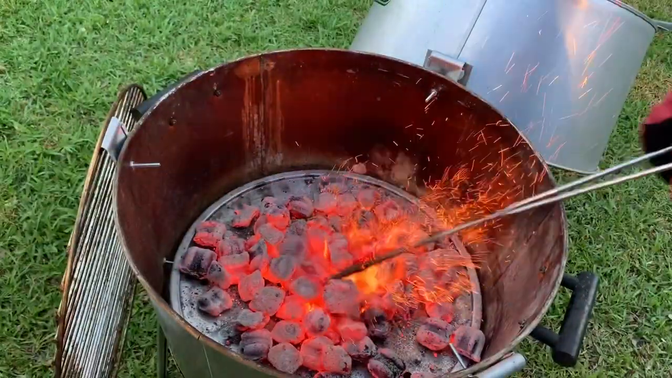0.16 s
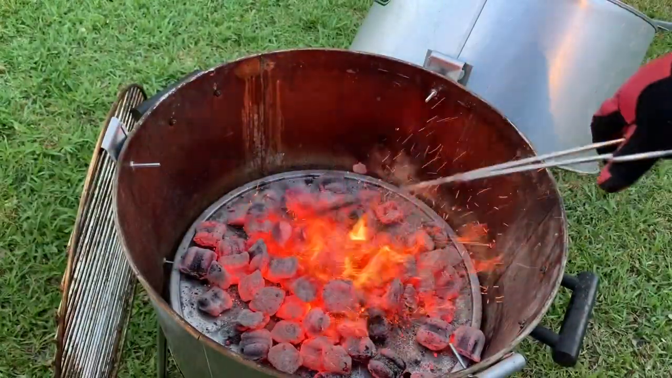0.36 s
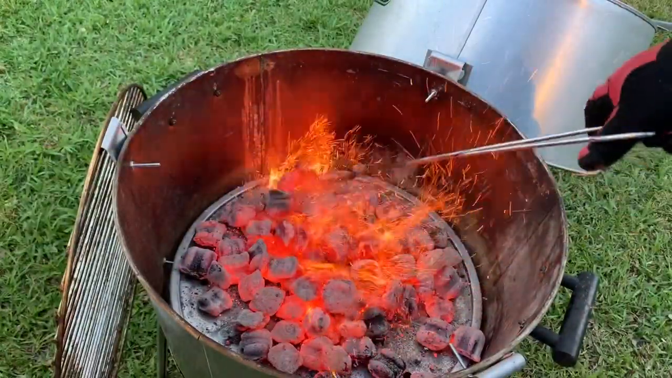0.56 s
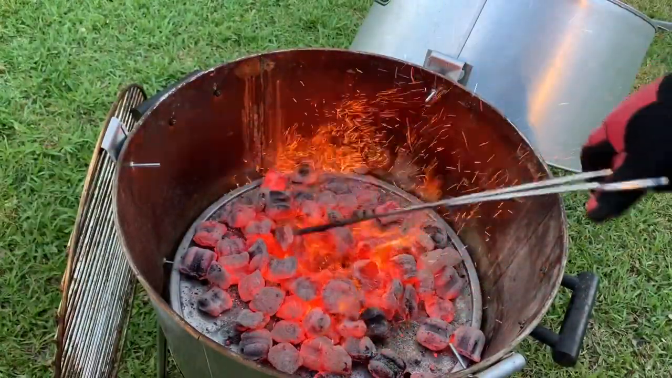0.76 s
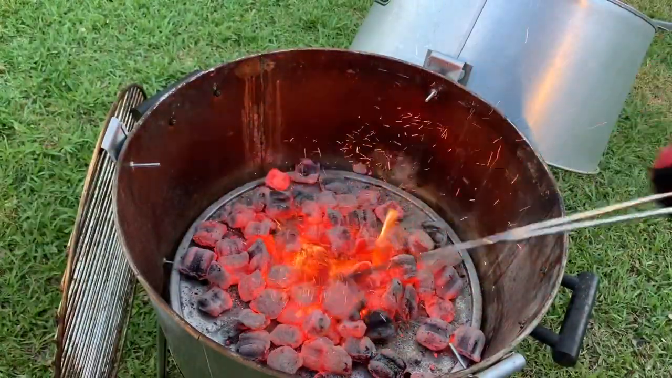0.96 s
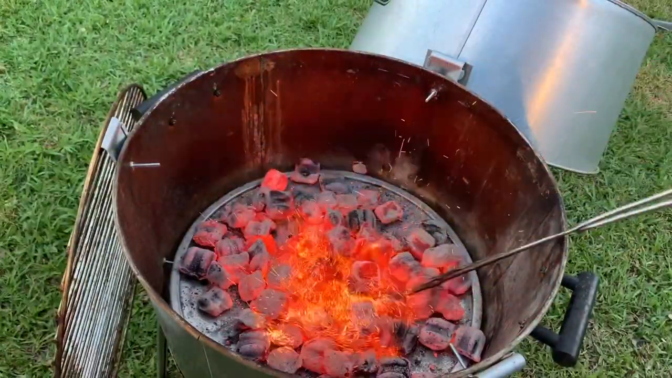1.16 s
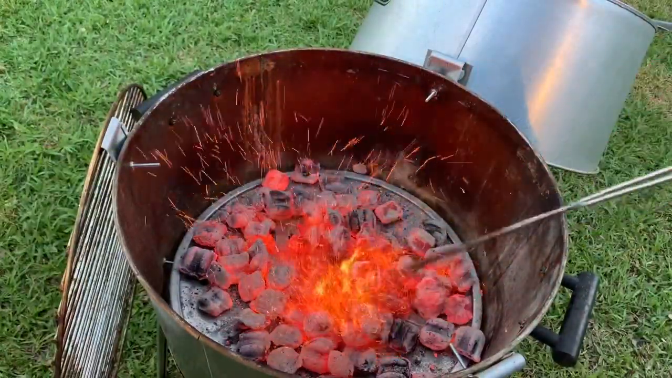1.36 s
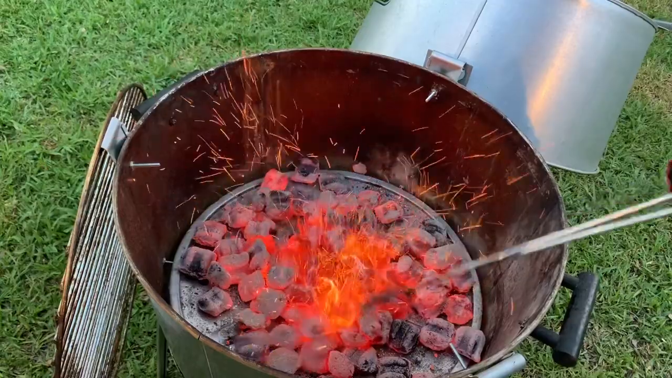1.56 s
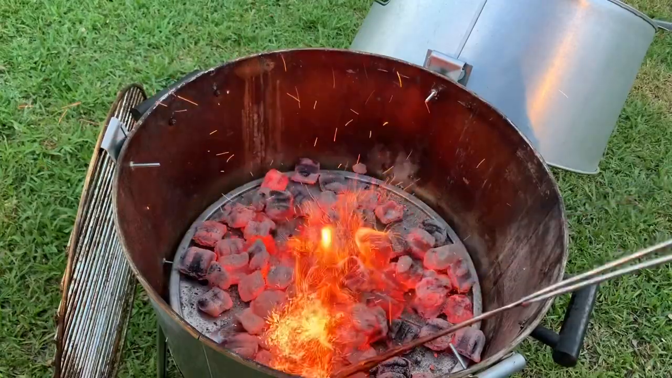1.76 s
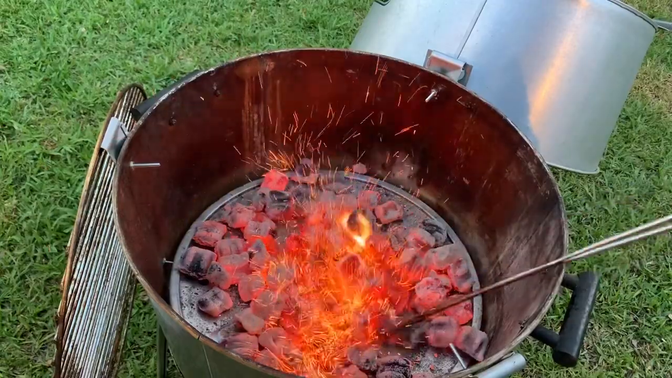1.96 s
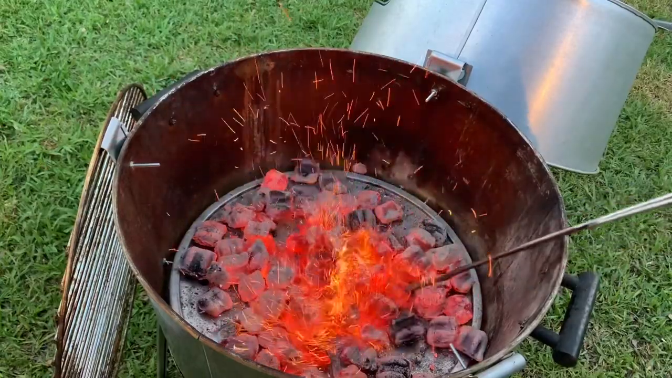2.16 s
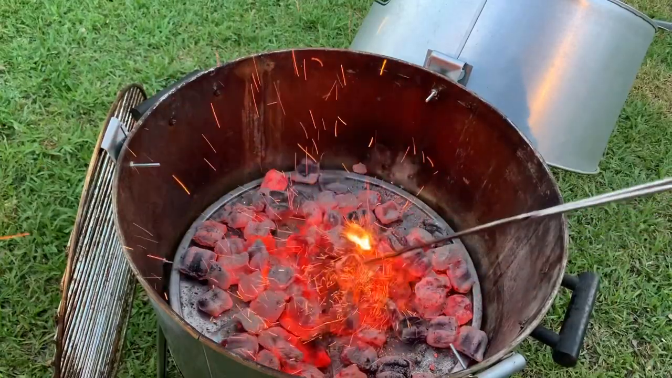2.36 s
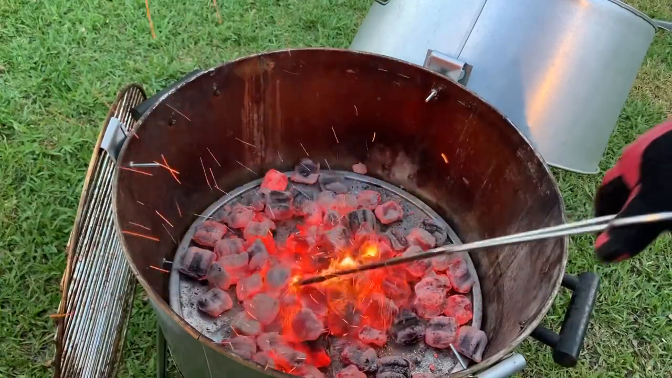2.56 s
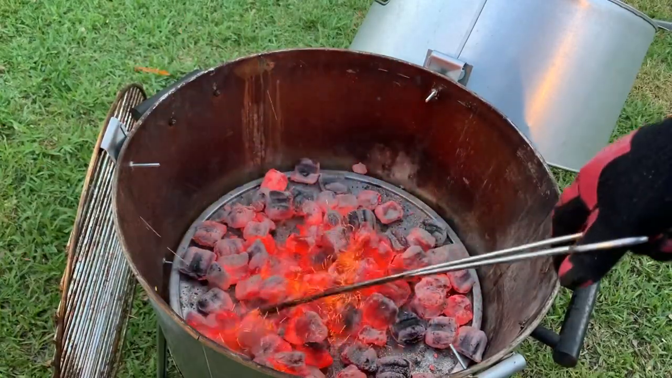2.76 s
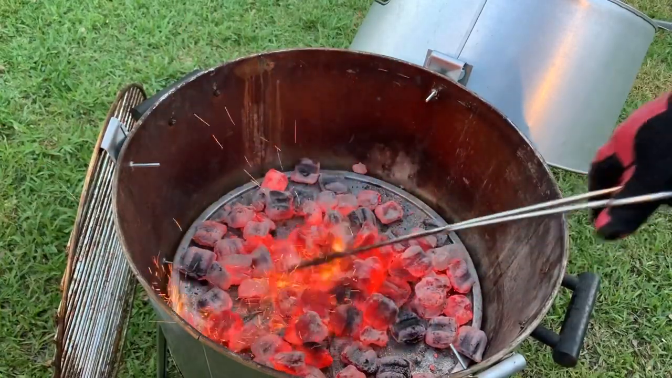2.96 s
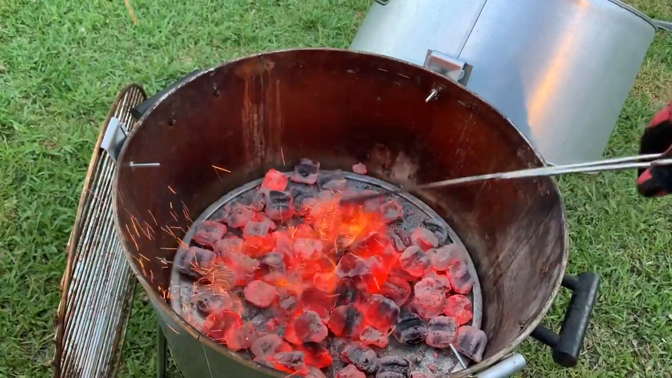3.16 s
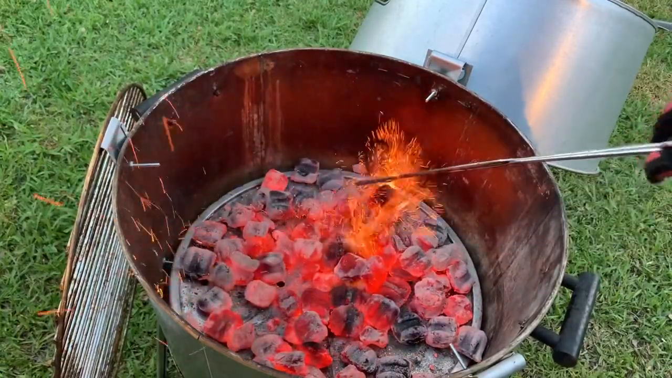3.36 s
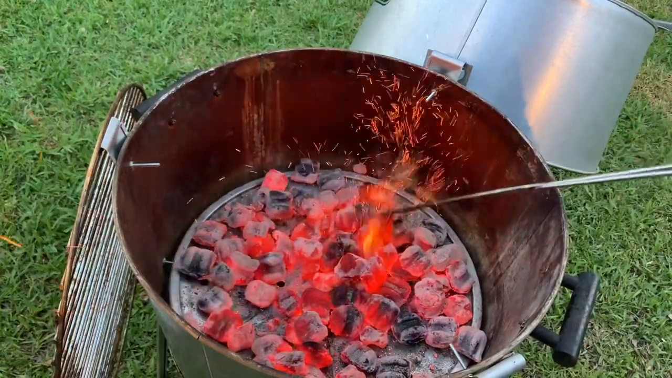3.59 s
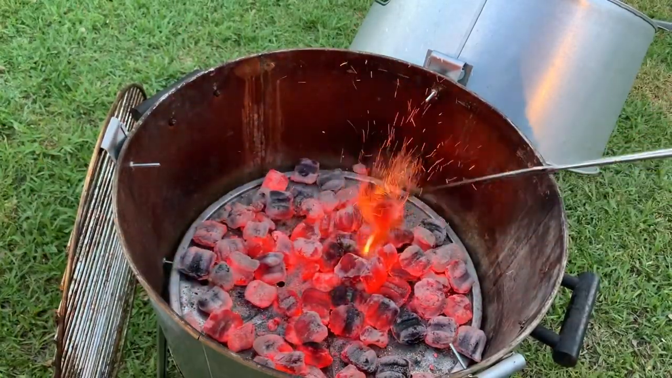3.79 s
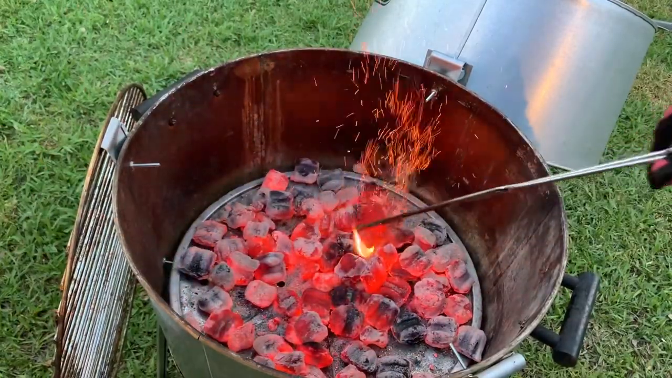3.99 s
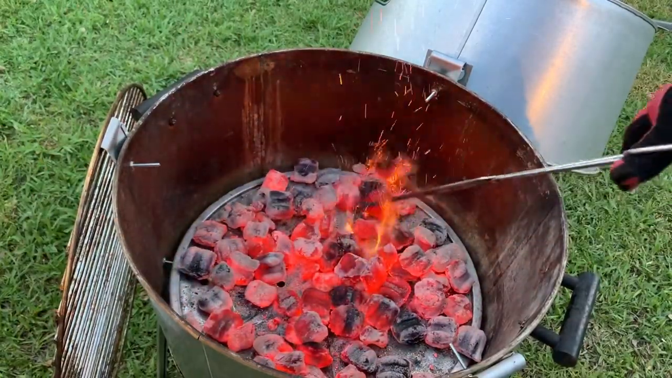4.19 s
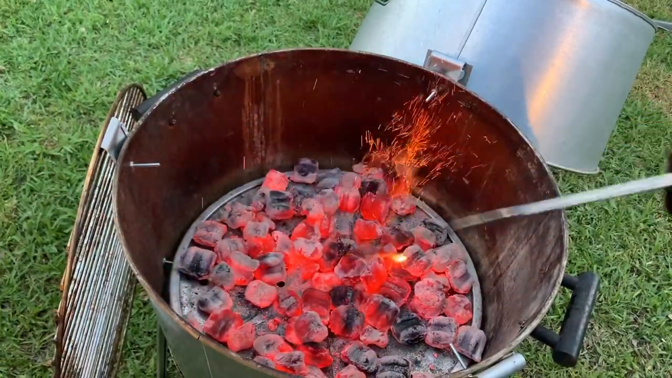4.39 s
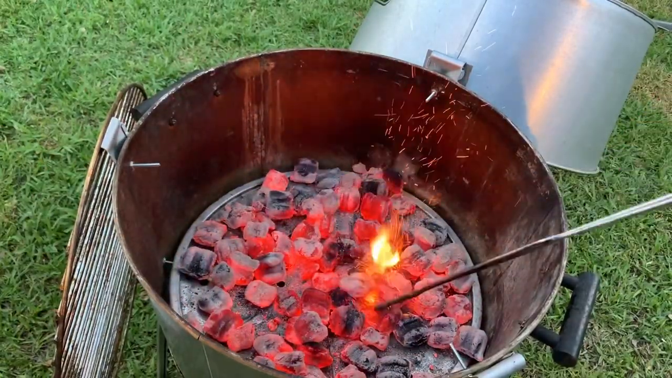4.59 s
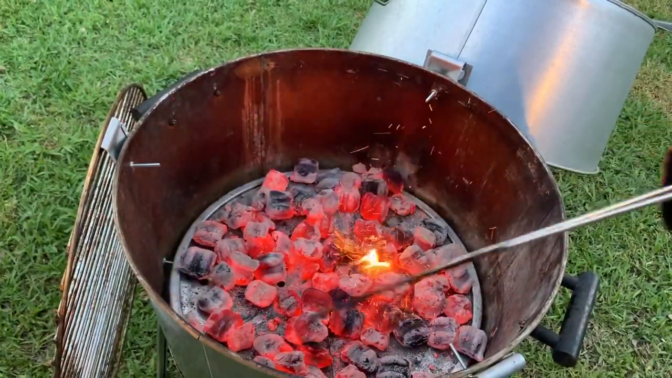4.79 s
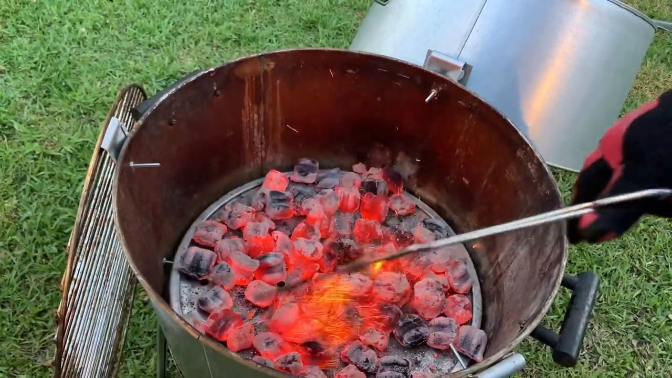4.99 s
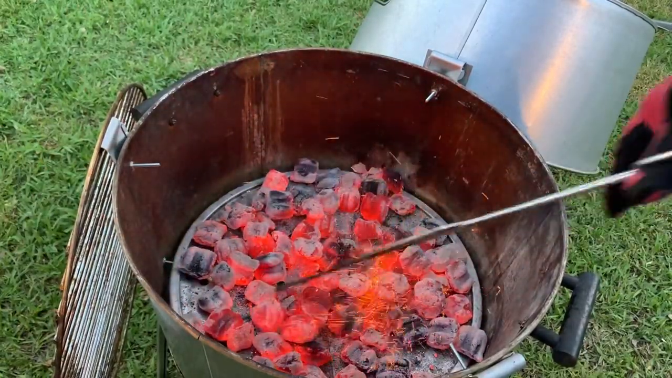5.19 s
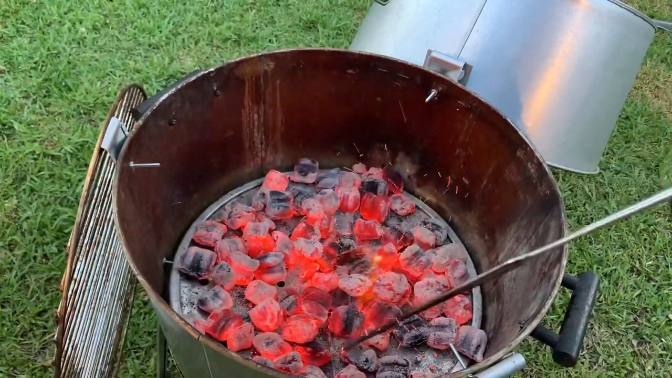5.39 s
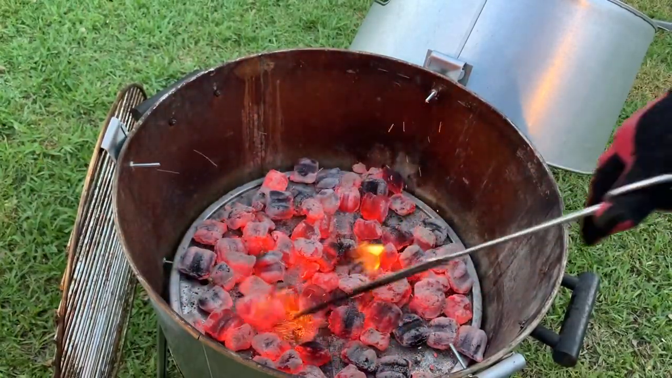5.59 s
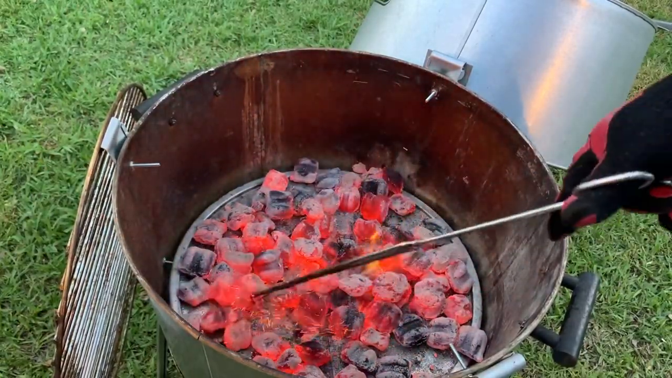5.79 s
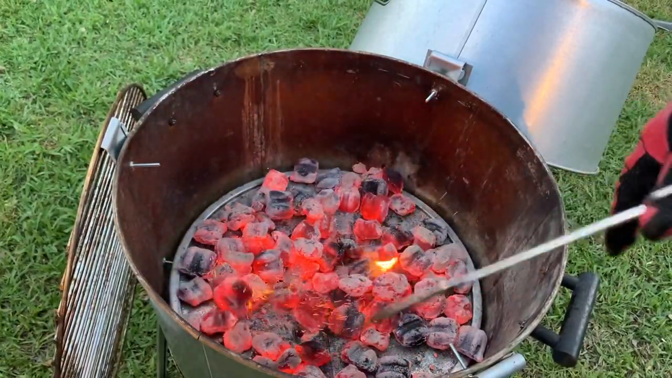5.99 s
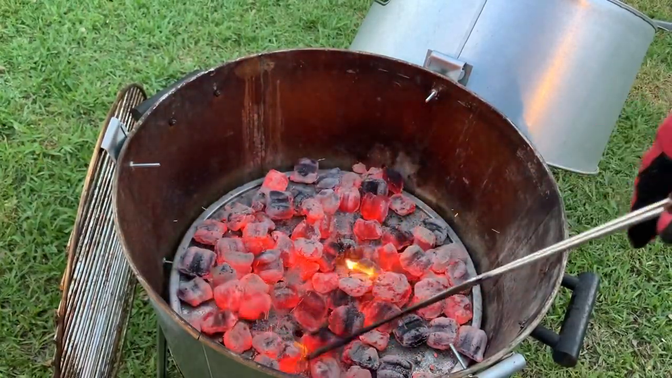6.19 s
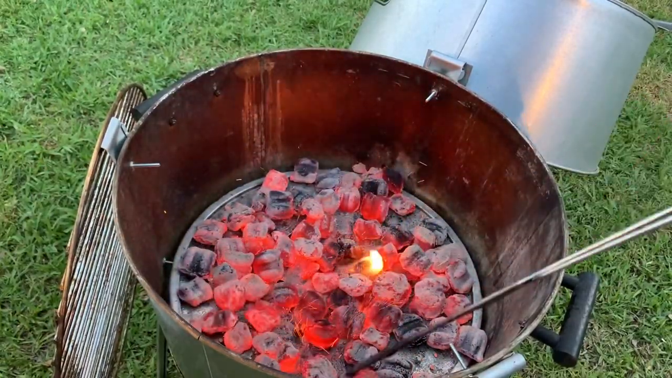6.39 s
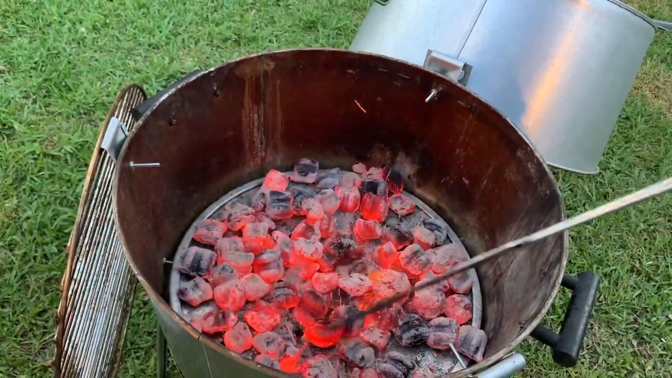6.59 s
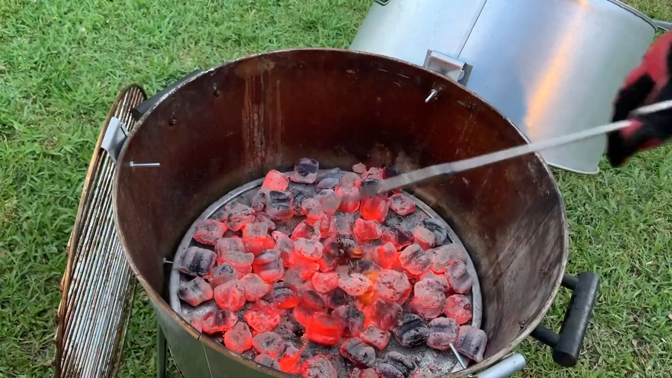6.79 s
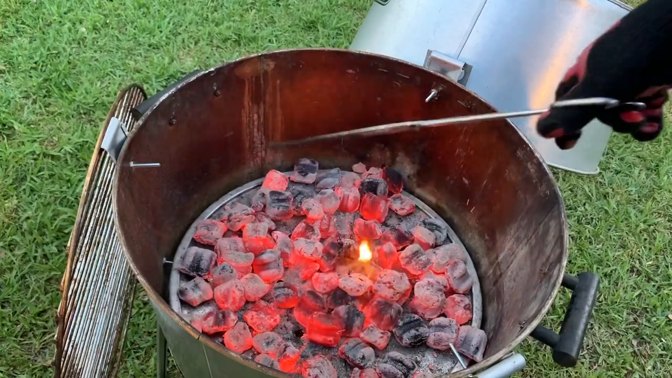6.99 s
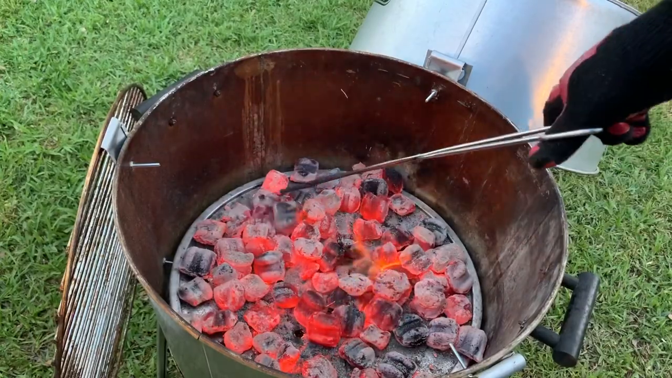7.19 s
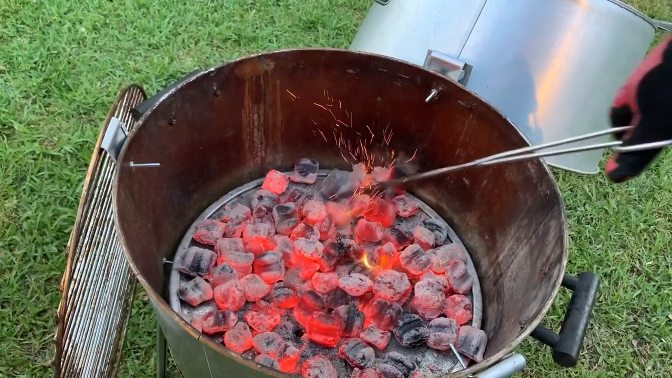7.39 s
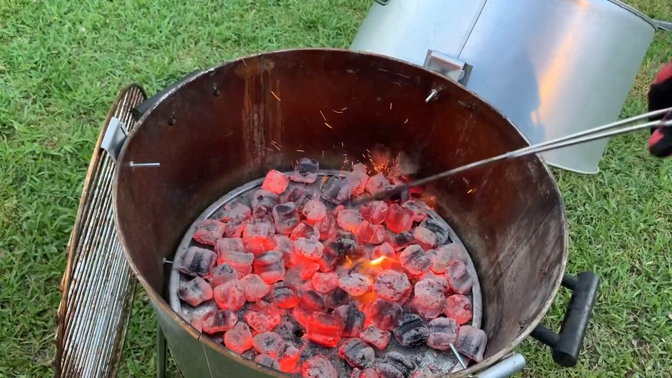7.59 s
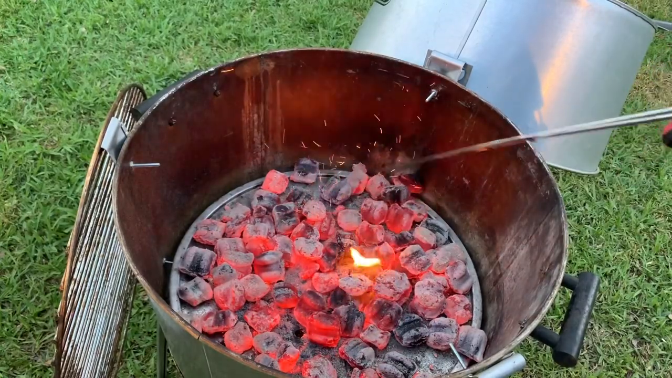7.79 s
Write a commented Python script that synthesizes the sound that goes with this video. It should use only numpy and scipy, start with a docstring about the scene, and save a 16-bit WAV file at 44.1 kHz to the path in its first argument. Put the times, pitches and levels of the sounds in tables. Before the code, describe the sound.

Metal tongs push brittle, dry coals around a steel barrel on a lawn. Lumps rattle, drop and strike the grate with clunks and short boomy resonance, while ash sifts and crunches. A few sharp spark pops cut through the busy first half. After a heavy clank and soft drum thumps midway, gentler strokes follow, with a little juddering metal and grinding near the end. Heard close, with low outdoor rumble.

```python
"""On a lawn, glowing charcoal is raked with steel tongs in a drum-shaped steel grill.
Lumps crunch, tumble and drop as short grains and decaying modes; their knocks set grate and drum ringing.
The tongs clink as struck modes and scrape or judder by stick and slip; sparks snap as short noise bursts.
Insects buzz faintly in bands of noise over a low outdoor rumble, all heard at a pair of microphone ports."""
import sys
import numpy as np
from scipy import signal
from scipy.fft import rfft, irfft, next_fast_len
from scipy.io import wavfile
from scipy.ndimage import uniform_filter1d, map_coordinates

SR = 44100
rng = np.random.default_rng(int(sys.argv[2]) if len(sys.argv) > 2 else 0)


def store_wav(level_fs):
    """Save 16-bit WAV to argv[1]."""
    pcm = np.round(np.clip(np.atleast_2d(level_fs), -1, 1) * 32767)
    wavfile.write(sys.argv[1], SR, pcm.T.astype(np.int16))


N = 346185

# Levels in tables are relative. A spectrum's density_db is power per hertz and sets only the colour.


def amp(db):
    """Level law: decibels to amplitude gain."""
    return 10 ** (np.asarray(db) / 20)


def unit(x):
    """Normalisation: x at rms 1."""
    return x / np.sqrt(np.mean(x ** 2) + 1e-20)


def along(points, hz):
    """Logarithmic frequency scale: (hz, value) points interpolated at hz."""
    f, v = np.transpose(points)
    return np.interp(np.log(hz + 1), np.log(f + 1), v)


def wobble(rate, size=N):
    """Slow random modulation: a smooth curve through rate random knots a second."""
    knots = rng.standard_normal(int(size * rate / SR) + 4)
    return map_coordinates(knots, [np.arange(size) * rate / SR])


def filtered(x, response):
    """Linear filtering: the spectrum of x times a response of frequency."""
    m = next_fast_len(N + SR // 2)
    spectrum = rfft(x, m) * response(np.fft.rfftfreq(m, 1 / SR))
    return irfft(spectrum, m)[..., :N]


def coloured(x, spectrum, size=4096):
    """Minimum-phase filtering: a causal colour that keeps the power of white noise."""
    cepstrum = irfft(np.log(amp(along(spectrum, np.fft.rfftfreq(size, 1 / SR)))))
    # folding the cepstrum onto positive times makes the filter causal
    cepstrum[1:size // 2] *= 2
    cepstrum[size // 2 + 1:] = 0
    pulse = irfft(np.exp(rfft(cepstrum)))
    return signal.fftconvolve(x, pulse[None] / np.linalg.norm(pulse), axes=1)[:, :N]


def fade(t, t60):
    """Exponential damping: a decay of 60 dB in t60 seconds."""
    return np.exp(-np.log(1000) * t / t60)


def add(track, s, sound):
    """Superposition: mix a sound into a track from time s in seconds."""
    part = track[..., max(round(s * SR), 0):][..., :sound.shape[-1]]
    part += sound[..., :part.shape[-1]]


def ringing(modes, t):
    """Modal synthesis: one complex decaying wave for each (hz, level_db, t60_s) mode."""
    return np.array([amp(db) * fade(t, t60) * np.exp(2j * np.pi * hz * t) for hz, db, t60 in modes])


def struck(waves, scatter_db, detune):
    """Modal excitation: each blow weights the modes anew, and the shifting load makes their pitch wander."""
    sides = (2, len(waves))
    gains = amp(scatter_db * rng.standard_normal(sides))
    weights = gains * np.exp(2j * np.pi * rng.random(sides))
    steps = np.arange(waves.shape[1])
    bent = np.cumsum(1 + detune * wobble(30, size=len(steps)))
    return np.array([np.interp(bent, steps, wave, right=0) for wave in (weights @ waves).imag])


def grains(rate, low_hz, high_hz, cycles, spread_db):
    """Granular contact noise: rate brief rings a second, each at its own pitch, a few much louder."""
    when, pitch, force, lean = rng.random((int(rate * N / SR), 4)).T
    hz = low_hz * (high_hz / low_hz) ** pitch
    # the second limit on a grain's length bounds the memory used
    t = np.arange(int(min(cycles / low_hz * SR, 2600000.0 / len(hz)))) / SR
    size = amp(-spread_db * np.log(1 - .97 * force)) * hz / low_hz
    waves = size[:, None] * np.sin(2 * np.pi * hz[:, None] * t) * fade(t, cycles / hz[:, None])
    at = ((when * N).astype(int)[:, None] + np.arange(len(t))).ravel()
    turn = 2 * np.pi * lean[:, None]
    pair = [np.bincount(at, (waves * way(turn)).ravel(), N)[:N] for way in (np.cos, np.sin)]
    return unit(np.array(pair))


def in_drum(x, wet_db, t60):
    """Reverberation: sound bounces between the steel walls before it leaves, as a decaying noise tail."""
    t = np.arange(SR // 3) / SR
    tail = rng.standard_normal((2, len(t))) * fade(t, t60)
    echo = signal.fftconvolve(x, tail / np.linalg.norm(tail[0]), axes=1)[:, :N]
    return x + amp(wet_db) * echo


def gesture(events, rise_s, fall_db_per_s):
    """Level envelope in dB: each (start_s, length_s, level_db) rises 20 dB in rise_s, holds, then falls."""
    t = np.arange(N) / SR
    level = np.full(N, -120.)
    for s, length, db in events:
        before, after = np.maximum(s - t, 0), np.maximum(t - s - length, 0)
        level = np.maximum(level, db - 20 * before / rise_s - fall_db_per_s * after)
    return level


def patchy(x, depth_db):
    """Time-varying resonance: each lump under the tongs has its own colour, so broad bands come and go."""
    z = signal.stft(x, nperseg=512)[2]
    field = uniform_filter1d(rng.standard_normal(z.shape[1:]), size=3, axis=0)
    field = uniform_filter1d(field, size=9, axis=1)
    return unit(signal.istft(z * amp(depth_db * unit(field)), nperseg=512)[1][:, :N])


def chatter(rate):
    """Amplitude modulation: a gain that flickers as a loose contact rattles."""
    return unit(amp(4 * wobble(rate)))


def garden():
    """Band-limited noise: low outdoor rumble, a nearly steady insect chorus and swells of cicadas."""
    # outdoor rumble: hz, density_db
    air_colour = [(20, -24), (40, -4.5), (60, -2.5), (100, -4), (220, -6), (400, -22), (1000, -31.5),
                  (3000, -45), (10000, -49), (16000, -56.5)]
    # insect chorus: centre_hz, width_hz, level_db
    chorus_bands = [(2150, 250, -81), (3100, 350, -81), (5650, 600, -74), (8150, 550, -75)]
    # swells of cicadas: start_s, length_s, centre_hz, width_hz, level_db
    cicada_swells = [(1.726, 0.62, 3460, 2345, -55), (4.8, 0.93, 5640, 2440, -68),
                     (6.131, 0.44, 3660, 2230, -57.5)]
    rise_s, fade_db_per_s = 0.37, 137

    def band(hz, width):
        noise = rng.standard_normal((2, N))
        return unit(filtered(noise, lambda f: np.exp(-2 * ((f - hz) / width) ** 2)))

    air = amp(-52.5 + 2.0 * wobble(2.6)) * coloured(rng.standard_normal((2, N)), air_colour)
    chorus = sum(amp(db + wobble(1.6)) * band(hz, width) for hz, width, db in chorus_bands)
    cicadas = np.zeros((2, N))
    for s, length, hz, width, db in cicada_swells:
        swell_db = gesture([(s, length, db)], rise_s, fade_db_per_s) + 1.4 * wobble(64)
        cicadas += amp(swell_db) * band(hz, width)
    return air + chorus + cicadas


def stroke_levels():
    """Dissipation: after each stroke ash quiets soonest, lumps settle later, the drum falls quiet last."""
    # strokes of the tongs through the coals: start_s, length_s, tumbling_lumps_db, crunching_ash_db
    strokes = [(0.004, 0.3, -43.5, -54.5), (0.248, 0.098, -40.5, -44.5), (0.38, 0.12, -44, -50.5),
               (0.587, 0.053, -44, -62.5), (0.691, 0.14, -48, -52.5), (0.921, 0.23, -41.5, -46.5),
               (1.517, 0.13, -45.5, -51.5), (1.815, 0.15, -51.5, -52), (1.923, 0.1, -36, -55.5),
               (2.448, 0.089, -46, -47.5), (2.606, 0.13, -44, -55.5), (2.846, 0.15, -45, -46.5),
               (3.079, 0.058, -43, -44.5), (3.449, 0.088, -47, -53), (3.658, 0.3, -47, -65.5),
               (3.931, 0.17, -41.5, -45.5), (4.082, 0.097, -38, -51.5), (4.354, 0.19, -48, -58),
               (4.785, 0.088, -47.5, -56), (4.983, 0.19, -54.5, -70), (5.477, 0.23, -50.5, -57.5),
               (6.007, 0.13, -49, -53.5), (6.201, 0.3, -53, -71), (7.058, 0.1, -52.5, -60.5),
               (7.287, 0.16, -43.5, -50)]
    bite_s = 0.035  # the tongs dig in
    ash_stop, lumps_settle, rumble_fade, trickle_fade = 201, 91, 33, 45  # dB per s
    trickle_db = -16  # ash keeps sifting down, this far below the crunch
    # drum rumble under a usual stroke, its dB per dB of tumbling, and the tumbling of a usual stroke
    rumble_db, rumble_grows, usual_stroke_db = -41, 0.53, -46
    lumps = [(s, length, db) for s, length, db, _ in strokes]
    ash = [(s, length, db) for s, length, _, db in strokes]
    drum = [(s, length, rumble_db + rumble_grows * (db - usual_stroke_db)) for s, length, db in lumps]
    trickle = trickle_db + gesture(ash, bite_s, trickle_fade)
    ash_db = np.maximum(gesture(ash, bite_s, ash_stop), trickle)
    return gesture(drum, bite_s, rumble_fade), gesture(lumps, bite_s, lumps_settle), ash_db


def raking():
    """Granular friction: ash crunches finely, lumps tumble coarsely, and the grate jostles the drum."""
    # colours of crunching ash, tumbling lumps and drum rumble: hz, density_db
    crunch_colour = [(700, -11), (2000, 5), (3200, -2.5), (4400, 2.5), (5500, -1), (7300, 7), (10000, 4.5),
                     (13000, 2.5), (15600, -0.5), (16300, -28)]
    tumble_colour = [(200, -23.5), (400, 0), (600, -0.5), (850, 0.5), (1400, -6.5), (2200, -18.5),
                     (4000, -17), (8000, -47.5)]
    boom_colour = [(50, -37.5), (90, -19.5), (130, -16), (185, -4.5), (225, -4), (285, 0), (335, -1.5),
                   (400, -15), (700, -23)]
    chink_db = -12.5  # small hard pieces chinking, against the tumbling
    boom_db, tumble_db, crunch_db = stroke_levels()
    crunch = coloured(grains(rate=1500, low_hz=2010, high_hz=15800, cycles=7.0, spread_db=1.0), crunch_colour)
    # charcoal is porous and dull: each contact dies within a few cycles
    tumble = coloured(grains(rate=520, low_hz=400, high_hz=5500, cycles=11, spread_db=2.4), tumble_colour)
    boom = coloured(grains(rate=240, low_hz=80, high_hz=450, cycles=8, spread_db=1), boom_colour)
    chinks = grains(rate=220, low_hz=1100, high_hz=6000, cycles=14, spread_db=3)
    # the heap holds and gives way in small slides, which the fine and the coarse share
    slides_db = 1.3 * wobble(35)
    crunch = patchy(in_drum(crunch, wet_db=5.5, t60=0.06), depth_db=3)
    crunch = amp(crunch_db + 5.5 + slides_db) * crunch
    tumble = patchy(in_drum(tumble, wet_db=2.0, t60=0.18), depth_db=1.5)
    tumble = amp(tumble_db + slides_db) * tumble
    boom = amp(boom_db) * unit(in_drum(boom, wet_db=7.0, t60=0.19))
    chinks = amp(tumble_db + chink_db) * unit(in_drum(chinks, wet_db=0, t60=0.086))
    return crunch + tumble + chinks + boom


def drops():
    """Free vibration: a falling lump rings with a hollow tock in a few close, dull modes and nudges the grate."""
    # single lumps dropping: start_s, pitch_hz, tock_db, thud_db
    falls = [(0.052, 896, -40, -38), (0.421, 895, -38.5, -48), (0.5405, 1077, -26, -29.5),
             (0.978, 876, -31, -42), (2.757, 1010, -31.5, -38), (3.141, 924, -39.5, -29),
             (3.514, 866, -42, -39), (4.029, 1063, -35, -33), (5.143, 802, -38, -41.5),
             (5.575, 834, -43, -40), (5.854, 790, -30.5, -34.5), (6.194, 862, -33, -40),
             (6.247, 726, -38.5, -48), (7.157, 788, -39, -44)]
    # modes of a hollow lump: pitch_ratio, level_db, t60_s
    hollow = [(0.58, -6, .07), (0.81, 0, .08), (1, -2, .06), (1.21, -3, .08), (1.55, -9, .05),
              (2, -18, .04)]
    thud_hz, thud_t60_s = 278.3, 0.072  # the grate gives under it
    t = np.arange(SR // 5) / SR
    tocks, thuds = np.zeros((2, 2, N))
    thud = (1 - fade(t, .03)) * fade(t, thud_t60_s) * np.sin(2 * np.pi * thud_hz * t)
    for s, hz, tock_db, thud_db in falls:
        waves = ringing([(hz * ratio, db, t60) for ratio, db, t60 in hollow], t)
        tock = (1 - fade(t, .008)) * struck(waves, scatter_db=1.5, detune=.02)
        add(tocks, s, amp(tock_db) * tock)
        add(thuds[0], s + .003, amp(thud_db + 7) * thud)
    return in_drum(tocks * chatter(rate=450), wet_db=-2.5, t60=0.2) + thuds


def sparks():
    """Impulsive radiation: a spark is a dry snap of noise, gone in milliseconds, with a faint echo."""
    # sparks bursting from the coals: start_s, level_db
    bursts = [(0.131, -8), (0.2853, -22), (0.476, -28.5), (0.733, -7.5), (1.1885, -24.5), (2.056, -26),
              (2.3348, -22.5), (4.2219, -21.5), (4.504, -19), (4.657, -25)]
    # colour of a snap: hz, density_db
    pop_colour = [(700, -26), (1800, -15), (4000, -17), (7500, -12), (10000, 0), (15000, 3.5), (17000, -20)]
    t = np.arange(SR // 20) / SR
    snaps = np.zeros((2, N))
    for s, db in bursts:
        decay = fade(t, .0035) + amp(-20) * fade(t, .045)
        snap = rng.standard_normal((2, len(t))) * decay
        add(snaps, s + 0.00048, amp(db + 13.5) * snap / np.linalg.norm(snap[0]))
    return coloured(snaps, pop_colour)


def clunk(hz, count=14):
    """Multiple collision: lumps of many sizes around hz strike within a few milliseconds and ring."""
    # life in cycles, spread of log pitch, time over which they land (s)
    life_cycles, spread, clatter_s = 42, .28, .009
    delay, shift, lean = rng.random((3, count, 1))
    rank = (np.arange(count)[:, None] + shift) / count
    pitch = hz * np.exp(spread * np.sqrt(12) * (rank - .5))
    age = np.maximum(np.arange(SR // 8) / SR - clatter_s * delay, 0)
    # middle sizes are the loudest
    waves = np.sin(2 * np.pi * pitch * age) * fade(age, life_cycles / pitch) * np.sin(np.pi * rank)
    pair = [(waves * way(2 * np.pi * lean)).sum(0) for way in (np.cos, np.sin)]
    return np.array(pair) * np.sqrt(8 / count)


def knocks():
    """Impact excitation: brittle lumps clatter and echo in the drum; grate and drum ring on."""
    # lumps knocked against grate and wall:
    # start_s, clack_db, clack_hz, thud_db, thud_hz, drum_boom_db, grit_db
    blows = [(0.136, -24.5, 1060, -34.5, 283, -58.5, -25), (0.252, -32, 875, -34.5, 178, -52.5, -34.5),
             (0.566, -24.5, 600, -21, 274, -58.5, -37.5), (0.67, -28.5, 790, -27.5, 316, -65, -34.5),
             (0.918, -33, 706, -37, 238, -62.5, -45), (1.022, -25.5, 723, -30, 235, -46.5, -42.5),
             (1.136, -14, 1280, -20.5, 287, -33, -39), (1.152, -20.5, 1360, -31, 308, -61, -41),
             (1.387, -33.5, 768, -30, 267, -45, -34), (1.507, -31, 523, -27, 285, -37.5, -33.5),
             (1.537, -26, 520, -29, 220, -35.5, -46), (1.878, -25.5, 650, -26.5, 243, -41, -30),
             (1.926, -11, 1156, -14.5, 291, -28.5, -28), (1.951, -20.5, 814, -22, 287, -37.5, -55),
             (2.008, -34.5, 1170, -24.5, 257, -55, -58), (2.323, -32.5, 536, -31, 263, -39, -33),
             (2.403, -34, 543, -36, 300, -58, -41), (2.678, -31.5, 890, -42, 302, -42, -31.5),
             (2.829, -34, 1116, -47, 191, -59.5, -32), (3.063, -36.5, 670, -34.5, 265, -47, -34),
             (3.445, -29, 727, -28, 263, -41, -31), (3.615, -9.5, 903, -12, 287, -25, -19.5),
             (3.975, -30.5, 740, -37, 294, -55, -34), (4.071, -29.5, 490, -27, 274, -33.5, -26.5),
             (4.097, -17.5, 554, -18.5, 308, -40.5, -27.5), (4.223, -31, 484, -23, 262, -37.5, -34.5),
             (4.352, -35, 648, -33, 282, -34.5, -31), (4.489, -33, 1620, -27.5, 326.4, -39.5, -36.5),
             (4.776, -33.5, 540, -31, 240, -35.5, -40), (4.797, -25, 596, -28.5, 300, -43, -55),
             (5.08, -38.5, 1120, -47, 207, -35, -55.5), (5.348, -33, 630, -33, 330, -35, -42.5),
             (5.628, -30, 622, -24, 325, -61, -49), (5.986, -27, 790, -29, 225, -31, -31.5),
             (6.085, -34.5, 1080, -44, 237, -62, -45), (6.328, -32, 776, -31, 284, -56, -30.5),
             (6.386, -29, 647, -28.5, 327, -34.5, -32), (7.053, -26.5, 830, -26, 318, -37.5, -29.5),
             (7.39, -25.5, 803, -25.5, 260, -39, -32.5), (7.781, -26, 422, -18, 263.3, -44, -40.5),
             (7.799, -29, 490, -32, 292, -30.5, -51), (7.838, -32.5, 610, -37, 290, -45, -48.5)]
    # modes of the steel drum and the air in it: pitch_hz, level_db, t60_s
    drum_modes = [(63, -26.5, 1.2), (90.8, -23.5, 1.87), (120.4, -21, 0.69), (162.1, -14, 0.72),
                  (190.7, -15, 0.99), (232.7, -10, 0.71), (262, -12, 0.8), (278.5, -9.5, .42),
                  (326.6, -4, 0.39), (374, -17, 0.48), (516.5, -17.5, 0.62)]
    # modes of the bare grate, before the coals damp it: pitch_hz, level_db, t60_s
    steel_modes = [(770, -2, 0.14), (813, 2, 0.73), (879, 1.5, 0.49), (924, -2.5, 0.3), (1094, 2.5, 0.38),
                   (1164, -5, 0.11), (1334, -2.5, 0.27), (1495, -7.5, 0.52), (1630, -5.5, 0.55),
                   (1865, -12.5, .2), (2080, -8, 0.1), (2330, 3.5, 0.15), (2510, -0.5, 0.21),
                   (3210, -1, 0.57), (3430, 5, 0.15), (4160, -6, 0.16), (6803, -4, 0.16)]
    # colours of clack, clink and grit: hz, density_db
    clack_colour = [(150, -35), (330, -5), (500, 5.5), (650, -0.5), (850, 0), (1300, -5.5), (1800, -7),
                    (2400, -21.5), (5000, -43.5)]
    clink_colour = [(900, -44), (1700, 6), (2400, 1), (2900, 3.5), (3500, 2), (4200, 3), (5200, -7.5),
                    (7000, -6.5), (12000, -55)]
    grit_colour = [(1500, -45.5), (3500, -7), (5300, -2.5), (7000, 6.5), (10000, 5.5), (12500, 4),
                   (15500, -2), (16300, -22)]
    # steel rings more under hard and gritty blows: dB, dB per dB of clack, dB per dB of grit
    clink_base_db, clink_per_clack, clink_per_grit = 6.5, 1.177, 0.46
    # lumps against the clack: level in dB, middle pitch as a ratio
    lump_db, lump_pitch = -1, 1.15
    t = np.arange(round(SR * .8)) / SR
    drum_waves, steel_waves = ringing(drum_modes, t), ringing(steel_modes, t)
    # the coals lying on the grate damp its ring
    steel_waves = steel_waves * fade(t, 0.45)
    deep = np.array([hz < 200 for hz, _, _ in drum_modes])[:, None]
    treble = np.array([hz > 2000 for hz, _, _ in steel_modes])[:, None]
    clack, clink, grit, body = np.zeros((4, 2, N))
    rise, soft_rise = 1 - np.exp(-t / 0.0037), 1 - np.exp(-t / 0.0017)
    deep_swell = 1 - np.exp(-t / 0.018)

    def clatter(t60, echo_db, echo_t60):
        decay = fade(t, t60) + amp(echo_db) * fade(t, echo_t60)
        return rng.standard_normal((2, len(t))) * rise * decay

    for s, clack_db, clack_hz, thud_db, thud_hz, boom_db, grit_db in blows:
        clink_db = clink_base_db + clink_per_clack * clack_db + clink_per_grit * grit_db
        touch = s - .002
        add(clack, touch, amp(clack_db - 10.0) * clatter(t60=0.062, echo_db=-5, echo_t60=0.44))
        add(clink, touch, amp(clink_db - 2.0) * clatter(t60=0.084, echo_db=-5.0, echo_t60=0.31))
        add(grit, touch, amp(grit_db + 1) * clatter(t60=0.071, echo_db=-8.5, echo_t60=0.2))
        add(body, touch, amp(clack_db + lump_db) * clunk(lump_pitch * clack_hz) * rise[:SR // 8])
        # the loaded grate gives a moment later and bounces at a pitch that depends on where it is hit
        bounce = (1 - fade(t, .025)) * fade(t, 0.11) * np.sin(2 * np.pi * thud_hz * t)
        thud = amp(thud_db + 7) * bounce
        drive = np.where(deep, amp(boom_db + 10.5) * deep_swell, amp(thud_db - 4))
        shell = struck(drum_waves * drive, scatter_db=2, detune=.025)
        add(body, s + 0.0024, soft_rise * (thud + shell))
        # hard contacts reach the upper modes of the steel
        hardness = np.where(treble, amp(clink_db - 11.5), amp(clack_db - 17))
        add(body, touch, rise * struck(steel_waves * hardness, scatter_db=3, detune=.004))
    # lumps rolling on the grate make the ring waver
    body = body * unit(amp(0.4 * wobble(45)))
    # debris lands unevenly, so each clatter dies away in small steps
    rattle = unit(amp(2 * wobble(130)))
    clatters = rattle * coloured(clack, clack_colour) + rattle * coloured(clink, clink_colour)
    return clatters + coloured(grit, grit_colour) + body


def scrapes():
    """Sliding friction: grit ground between tongs and grate slips densely and echoes in the drum."""
    # tongs grinding along the grate: start_s, length_s, level_db
    grinds = [(2.5, 0.073, -47), (2.84, 0.17, -48), (4.41, 0.011, -53), (7.272, 0.13, -45),
              (7.378, 0.0363, -43), (7.49, 0.012, -55)]
    # colour of the scrape: hz, density_db
    scrape_colour = [(500, -19.5), (1000, 2.5), (1600, 2.5), (2500, -2.5), (4500, -5), (6500, -9.5),
                     (10000, -30.5)]
    bite_s, fade_db_per_s = 0.011, 214
    slips = rng.standard_normal((2, N)) * amp(5 * wobble(800))
    slips = in_drum(slips, wet_db=-2, t60=.07)
    return amp(gesture(grinds, bite_s, fade_db_per_s)) * patchy(coloured(slips, scrape_colour), depth_db=1)


def tong_clinks():
    """Damped bar modes: the struck arms of the tongs ring briefly, damped by the glove."""
    # tips striking something hard: start_s, level_db, pitch_ratio (set by the grip)
    hits = [(2.677, -29, 1.02), (4.098, -26, .98), (5.987, -42.5, 1.1), (7.057, -41.5, 1.1)]
    # modes of the tongs' arms: pitch_hz (before the grip's ratio), level_db, t60_s
    arm_modes = [(1400, 0, .07), (1680, -2, .07), (2295, -8, .09), (2770, -3, .08), (3300, -9, .1),
                 (3690, -10, .07), (4355, 2, .07), (4760, -9, .09)]
    t = np.arange(SR // 5) / SR
    track = np.zeros((2, N))
    for s, db, ratio in hits:
        waves = ringing([(hz * ratio, level, t60) for hz, level, t60 in arm_modes], t)
        clink = (1 - fade(t, .012)) * struck(waves, scatter_db=1, detune=.003)
        add(track, s, amp(db) * clink)
    return in_drum(track * chatter(rate=430), wet_db=-13, t60=0.3)


def thumps():
    """Plate flexure: the load shifts and the drum's sheet-steel floor gives in a few soft, sagging cycles."""
    # dull thumps of the floor: start_s, nominal_pitch_hz, level_db
    gives = [(3.633, 184, -32), (3.698, 202, -26), (3.708, 152.3, -26.5), (3.734, 105, -33),
             (3.769, 171, -28), (3.798, 182, -29), (3.802, 90.2, -31.5), (3.852, 161, -33),
             (3.911, 170, -30), (3.985, 99.4, -30), (2.737, 280, -28.5), (3.204, 283, -35),
             (5.047, 131, -31), (5.119, 160, -37), (5.408, 164, -34), (7.093, 172, -32)]
    t = np.arange(SR // 5) / SR
    track = np.zeros((2, N))
    for s, hz, db in gives:
        # the pitch sags from 1.12 to 0.92 of nominal
        phase = 2 * np.pi * np.cumsum(hz * (.92 + .2 * fade(t, .1))) / SR
        envelope = (1 - np.exp(-t / 0.0044)) * fade(t, 0.073)
        add(track[0], s, amp(db + 5.5) * envelope * np.sin(phase))
    return track


def judders():
    """Stick and slip: uneven jerks feed one resonance, which rings out when the tongs come free."""
    # tongs catching along the steel: start_s, length_s, pitch_hz, level_db
    catches = [(4.485, 0.017, 693, -34), (4.51, 0.042, 802, -39), (4.51, .03, 885, -47),
               (5.362, 0.041, 1110, -49.5), (5.362, 0.033, 834, -47), (5.635, 0.055, 330, -32.5),
               (5.72, .09, 329.2, -41.5)]
    fade_db_per_s, rise_s, cycles_per_slip = 170, 0.0048, 7
    track = np.zeros((2, N))
    t = np.arange(SR // 3) / SR
    for s, length, hz, db in catches:
        slip_rate = hz / cycles_per_slip
        force = unit(amp(3 * wobble(slip_rate, size=len(t))))
        jerks = force * np.exp(.5j * wobble(slip_rate, size=len(t)))
        level = amp(db - fade_db_per_s * np.maximum(t - length, 0))
        wave = jerks * np.exp(2j * np.pi * hz * t) * (1 - np.exp(-t / rise_s)) * level
        add(track, s, np.array([wave.imag, wave.real]))
    return track


def ports(pair):
    """Interaural-style coherence: two ports share part of the sound, with phase and level differences."""
    # left-right likeness of the ports: hz, coherence (0 to 1)
    alike = [(50, .92), (120, .985), (300, .985), (600, .8), (1200, .6), (2500, .35), (4200, .5),
             (5300, .25), (7000, .8), (8600, .96), (15000, .95)]
    # phase by which left leads (negative: lags): hz, lead_rad
    lead = [(300, 0), (1700, .4), (3000, 1.4), (4400, .1), (6300, -.3), (8600, -3.14), (10900, -6.28),
            (11500, -6.4), (13400, -9.42), (15200, -12.5)]
    # left minus right: hz, level_db
    balance = [(100, 1.5), (280, -1.5), (600, 0.5), (1100, 2.5), (2200, 1), (5000, -3.5), (8000, -0.5)]

    def split(hz):
        turn = np.arccos(np.clip(along(alike, hz), 0, 1)) / 2
        return np.array([np.cos(turn), np.sin(turn)])

    shared, apart = filtered(pair, split)
    sides = np.array([[.5], [-.5]])

    def offset(hz):
        return amp(sides * along(balance, hz)) * np.exp(1j * sides * along(lead, hz))

    return filtered(np.array([shared + apart, shared - apart]), offset)


def scene():
    """Superposition: every source summed and heard at the two ports."""
    coals = raking() + drops() + sparks() + knocks()
    steel = scrapes() + tong_clinks() + thumps() + judders()
    return ports(garden() + coals + steel)


def record(dry):
    """Saturation and band limiting: the sharpest snaps are rounded off and nothing above 16.4 kHz is kept."""
    rounded = dry / (1 + np.abs(dry / .85) ** 8) ** (1 / 8)
    return filtered(rounded, lambda hz: hz < 16400)


dry = scene()
out = record(dry)
store_wav(out)
```